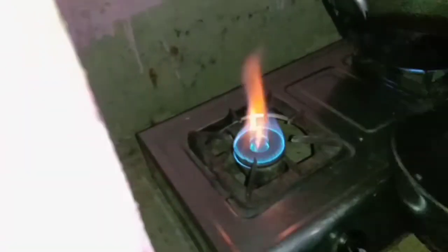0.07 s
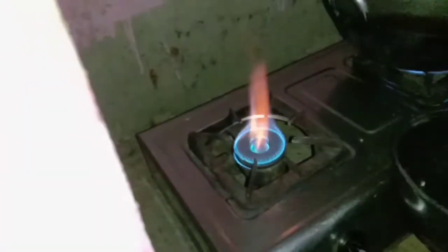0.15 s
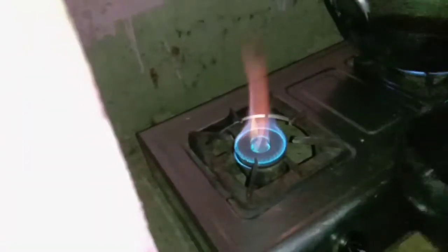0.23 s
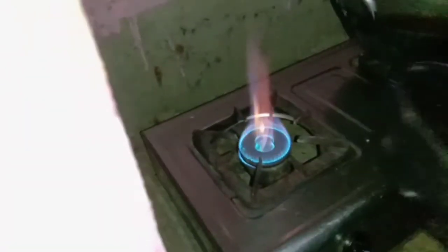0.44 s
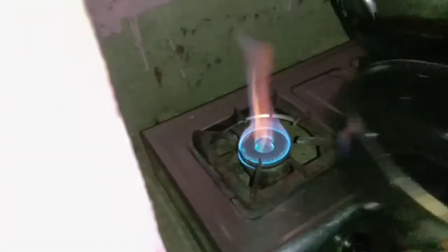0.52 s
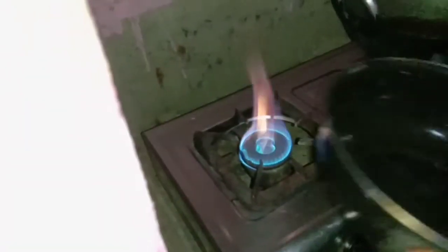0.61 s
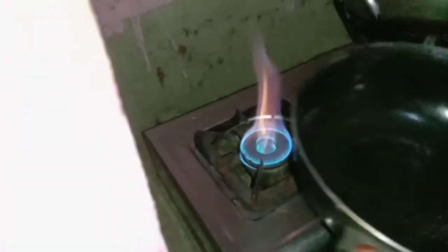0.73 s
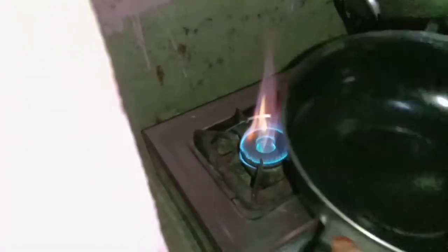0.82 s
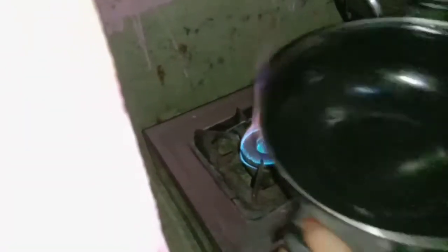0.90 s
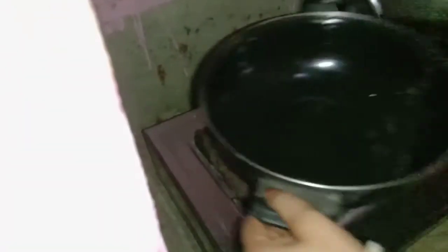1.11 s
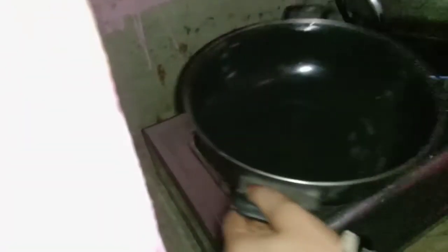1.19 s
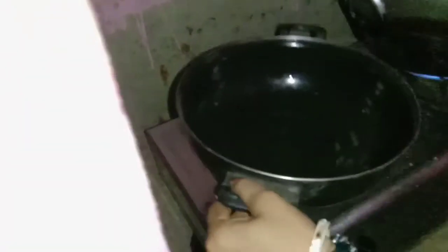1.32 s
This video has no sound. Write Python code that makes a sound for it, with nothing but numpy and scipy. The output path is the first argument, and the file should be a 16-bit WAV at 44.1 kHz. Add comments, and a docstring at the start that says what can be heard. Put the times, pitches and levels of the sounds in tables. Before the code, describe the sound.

A metal pan scrapes and clanks onto a gas stove, then rings and fades.

```python
"""A gas flame rumbles and hisses softly in a small kitchen. A metal pan slides off one side of the
stove, knocks twice against the pan support, scrapes over it with brief squeals and knocks twice more.
Lifted clear, it rings on, each mode swelling and dipping as it is swung towards the lit burner.
Light metal ticks follow as it is lowered."""
import sys
import numpy as np
from scipy import signal
from scipy.fft import rfft, irfft
from scipy.io import wavfile

SR = 44100
rng = np.random.default_rng(int(sys.argv[2]) if len(sys.argv) > 2 else 0)


def store_pcm(level_fs):
    """Save levels as 16-bit WAV."""
    pcm = np.round(np.clip(level_fs, -1, 1) * 32767).astype(np.int16)
    wavfile.write(sys.argv[1], SR, np.atleast_2d(pcm).T)


N = 59535

# Envelopes. Each row: time in seconds, level in dB.
HISS_ENVELOPE = [(.77, -68), (.85, -57.5), (.96, -62), (1.13, -74.5), (1.21, -83)]
RUMBLE_ENVELOPE = [(0, -67.5), (.575, -49), (.6, -45), (.63, -59), (.95, -61), (1.15, -41.5), (1.23, -84),
                   (1.36, -39)]  # grows as the pan disturbs the flame
SLIDE_FORCE = [(0, -39), (.05, -48), (.095, -49.5), (.15, -42.5), (.22, -37.5)]
SCRAPE_FORCE = [(.218, -52), (.235, -9), (.28, 1.5), (.305, -2.5), (.325, -1.5), (.348, -5), (.364, -20),
                (.385, -10.5), (.425, -9), (.52, -14)]
# Noise spectra. Each row: frequency in Hz, relative density in dB.
FLAME_SPECTRUM = [(130, -3), (700, -10.5), (1400, -8.5), (2300, -15.5), (4000, -22.5), (15000, -39)]
CLICK_SPECTRUM = [(2000, -32), (7500, -10), (12500, -16), (15000, -11)]
SLIDE_SPECTRUM = [(100, -44), (250, -39), (1300, 4), (2900, -13), (5000, 0.5), (7500, -12.5),
                  (15000, -17.5)]
GRIT_SPECTRUM = [(130, -58), (255, 8), (420, -33), (1200, -8.5), (2800, 3), (3900, -6), (6500, 0),
                 (13000, -4), (15200, -20)]
CRASH_SPECTRUM = [(90, -85), (190, -13.5), (420, -4.5), (850, -3), (1150, 6), (1650, 5), (2250, -3.5),
                  (3000, -6.5), (3600, 3.5), (5500, 0.5), (9000, -2.5), (13000, -11), (15200, -1.5)]
# Resonances. Each row: frequency in Hz, relative level in dB, t60 of the decay term in seconds.
SLIDING_MODES = [(683, -5, .09), (1240, 7, .13), (1735, 7, .07)]
STOVE_MODES = [(215, -3, .03), (610, 0, .03)]
CONTACT_MODES = [(668, -17, .2), (1112, -7, .2), (1150, -6, .2), (1235, -4, .05), (1640, -4, .04),
                 (1965, -4, .14), (2712, -6, .14), (3430, -3, .03), (3570, -2, .08), (3950, -1, .06),
                 (4555, -6, .08), (5297, -3, .05), (5845, -6, .06), (6620, -5, .08)]  # pan pressed on the support
# Light ticks. Each row: start in seconds, ring level in dB, t60 in seconds, click over ring in dB.
TICK_EVENTS = [(0.1975, -31, 0.042, -13), (0.552, -53, 0.18, 9.5), (0.602, -49.5, 0.071, 10.5),
               (0.944, -50, 0.085, 2), (1.088, -43, 0.056, -32), (1.171, -50, 0.024, -10),
               (1.259, -41.5, 0.038, -22), (1.274, -45.5, 0.14, -15), (1.3375, -39, 0.04, 2)]
# Tick resonances. Each row: frequency in Hz, relative level in dB.
TICK_BANDS = [(5000, -25), (8900, -19.5), (9550, -16), (10000, -18.5), (14800, -16.5)]
# Squeals. Each row: middle in seconds, frequency in Hz, level in dB, half-length in seconds.
SQUEAL_EVENTS = [(.195, 1245, -31, .025), (.278, 3573, -24, .012), (.324, 1116, -18.5, .016),
                 (.351, 1108, -22.5, .011), (.338, 1962, -27, .026)]
# Knocks. Each row: start in seconds, crash level in dB, crash t60 at CRASH_DAMP_HZ in seconds,
# impulse on the pan in dB, impulse on the stove in dB.
KNOCK_EVENTS = [(0.222, -19.5, 0.3, 2.5, -12), (0.246, -23, 0.067, 0.5, -9.5),
                (0.3713, -14.5, 0.18, 4.5, -18), (.399, -21, 0.11, 4, -12.5)]
# Free pan modes. Each row: frequency in Hz, relative level in dB, t60 in seconds,
# time of one dip in seconds, dips per second, dip depth from 0 to 1.
PAN_MODES = [(670, -25, .52, .68, 2.2, .25), (1104.3, -22, .77, .644, 3.3, .36),
             (1718.5, -31, 2.5, .83, 2.45, .45), (1957, -27, .38, .62, 4.8, .5),
             (2463, -38, 1.9, .817, 6.3, .55), (2710, -19.5, .5, .47, 4.4, .25),
             (3031, -30, 1.38, .623, 2.3, .9), (3283, -49, 1.9, .62, 2.2, .85),
             (3556, -24, .36, .765, 1.9, .38), (3675, -31, .47, .585, 5.4, .8),
             (4258, -29, .5, .519, 7.1, .9), (4958.5, -24, .65, .688, 3, .97),
             (5432, -24.5, .7, .5, 2.7, .9), (5990, -32, .76, .571, 6.3, .6),
             (6629, -30, .66, .52, 4.3, .55), (8091, -31, .45, .433, 4.5, .5)]

HISS_LOW_HZ, HISS_PATCHY_DB = 4800, 2.5
RUMBLE_HZ, FLUTTER_DB, BURNER_HZ, BURNER_DB, RUSH_DB = 156, -8, 1257, -57.5, -56
CATCHES_PER_S, CATCH_SCATTER_DB = 500, 5
SLIDE_HISS_DB, SQUEAL_WAVER_RAD, SCRAPE_RING_DB, SCRAPE_GRIT_DB = -1, .3, -21.5, -27.5
CRASH_DAMP_HZ, CRASH_ATTACK_S = 14000, .0012
HELD_DB, FREE_DB, RING_BUILD_S = -8.5, 1, .032  # pan on the support, then lifted clear
ROOM_T60_S, ROOM_DB = .28, -13
LOW_CUT_HZ, TOP_HZ = 80, 15550


def amp(db):
    return 10 ** (np.asarray(db) / 20)


def unit_rms(x):
    return x / np.sqrt(np.mean(x ** 2))


def time_s():
    return np.arange(N) / SR


def bins_hz():
    return np.arange(N // 2 + 1) * SR / N


def envelope(rows):
    """Gain along (s, dB) points, silent after the last."""
    at_s, db = np.array(rows).T
    return amp(np.interp(time_s(), at_s, db, right=-120))


def colour(x, spectrum):
    """Filter by (Hz, dB) points; unit RMS."""
    hz, db = np.array(spectrum).T
    gain = amp(np.interp(np.log(np.maximum(bins_hz(), 1)), np.log(hz), db))
    return unit_rms(irfft(rfft(x) * gain, N))


def noise_band(hz, half_width_hz):
    """Noise in one resonance with steep skirts."""
    detuning = (bins_hz() - hz) / half_width_hz
    return unit_rms(irfft(rfft(rng.standard_normal(N)) / (1 + detuning ** 2), N))


def decay(start_s, t60_s):
    age_s = time_s() - start_s
    return (age_s >= 0) * np.exp(-np.log(1000) * np.maximum(age_s, 0) / t60_s)


def rise(start_s, tau_s):
    return 1 - np.exp(-np.maximum(time_s() - start_s, 0) / tau_s)


def resonate(force, modes):
    """Share a force's energy among modes that build up briefly and decay."""
    t, out = time_s(), np.zeros(N)
    for hz, db, t60_s in modes:
        response = t * decay(0, t60_s) * np.sin(2 * np.pi * hz * t)
        out += amp(db) * unit_rms(signal.fftconvolve(force, response)[:N])
    return unit_rms(out) * np.std(force)


def hiss():
    """Faint high hiss; each band swells and sinks on its own."""
    out = np.zeros(N)
    for hz in np.geomspace(HISS_LOW_HZ, TOP_HZ, 6):
        out += amp(HISS_PATCHY_DB * noise_band(0, half_width_hz=23)) * noise_band(hz, hz / 10)
    return envelope(HISS_ENVELOPE) * unit_rms(out)


def flame():
    """Gas flame: fluttering rumble, soft burner tone, steady rush."""
    flutter = amp(FLUTTER_DB * noise_band(0, half_width_hz=4))
    rumble = envelope(RUMBLE_ENVELOPE) * unit_rms(flutter * noise_band(RUMBLE_HZ, half_width_hz=22.5))
    burner = amp(BURNER_DB) * noise_band(BURNER_HZ, half_width_hz=57)
    rush = amp(RUSH_DB) * colour(rng.standard_normal(N), FLAME_SPECTRUM)
    return rumble + burner + rush


def ticks():
    """Small bright metal contacts as the pan is handled."""
    ring = unit_rms(sum(amp(db) * noise_band(hz, half_width_hz=180) for hz, db in TICK_BANDS))
    click = colour(rng.standard_normal(N), CLICK_SPECTRUM)
    return sum(amp(db) * decay(start_s, t60_s) * (ring + amp(click_db) * click)
               for start_s, db, t60_s, click_db in TICK_EVENTS)


def stick_slip():
    """Dense friction catches of uneven size."""
    caught = rng.random(N) < CATCHES_PER_S / SR
    polarity = np.sign(rng.standard_normal(N))
    return unit_rms(caught * polarity * amp(CATCH_SCATTER_DB * rng.standard_normal(N)))


def slide():
    """Light first slide: friction makes the pan sing and hiss."""
    force = envelope(SLIDE_FORCE)
    ring = resonate(stick_slip() * force, SLIDING_MODES)
    return ring + amp(SLIDE_HISS_DB) * force * colour(rng.standard_normal(N), SLIDE_SPECTRUM)


def squeals():
    """Sliding metal locks briefly onto one resonance: a slightly rough tone."""
    t, out = time_s(), np.zeros(N)
    for middle_s, hz, db, half_s in SQUEAL_EVENTS:
        phase_rad = 2 * np.pi * (hz * t + rng.random())
        waver_rad = SQUEAL_WAVER_RAD * noise_band(0, half_width_hz=38)
        swell = np.exp(-((t - middle_s) / half_s) ** 2)
        out += amp(db) * swell * np.sin(phase_rad + waver_rad)
    return out


def scrape():
    """The base grinds over the support; each catch rattles the stove and rings the touching metal."""
    force = stick_slip() * envelope(SCRAPE_FORCE)
    rattle = rng.standard_normal(N) * decay(0, t60_s=.03)
    grit = colour(signal.fftconvolve(force, rattle)[:N], GRIT_SPECTRUM) * np.std(force)
    return amp(SCRAPE_RING_DB) * resonate(force, CONTACT_MODES) + amp(SCRAPE_GRIT_DB) * grit


def crashes():
    """Knocks shake the crowded, short-lived modes of the sheet-metal stove; treble dies first."""
    hz, out = bins_hz(), np.zeros(N)
    octave = np.floor(np.log2(np.maximum(hz, 250) / 250))
    for start_s, db, t60_s, _, _ in KNOCK_EVENTS:
        spectrum = rfft(colour(rng.standard_normal(N), CRASH_SPECTRUM))
        attack = rise(start_s, CRASH_ATTACK_S)
        for k in np.unique(octave):
            in_band = octave == k
            band_t60_s = 2 * t60_s / (1 + hz[in_band].mean() / CRASH_DAMP_HZ)
            out += amp(db) * attack * decay(start_s, band_t60_s) * irfft(spectrum * in_band, N)
    return out


def knocks():
    """The pan clanks against the support; the stove body thuds."""
    on_pan, on_stove = np.zeros((2, N))
    for start_s, _, _, clank_db, thud_db in KNOCK_EVENTS:
        at = int(start_s * SR)
        on_pan[at], on_stove[at] = amp(clank_db), amp(thud_db)
    return resonate(on_pan, CONTACT_MODES) + resonate(on_stove, STOVE_MODES)


def pan_ring():
    """The first knock pair rings the pan weakly, the second freely; turning swells and dips each mode."""
    t, out = time_s(), np.zeros(N)
    held_s, free_s = KNOCK_EVENTS[0][0], KNOCK_EVENTS[2][0]
    held, free = rise(held_s, RING_BUILD_S), rise(free_s, RING_BUILD_S)
    for hz, db, t60_s, dip_s, dips_per_s, depth in PAN_MODES:
        turning = np.abs(1 - depth * np.exp(2j * np.pi * dips_per_s * (t - dip_s)))
        on_support = amp(HELD_DB) * held * (1 - free) * decay(held_s, t60_s)
        lifted = amp(FREE_DB) * free * decay(free_s, t60_s) * turning
        out += amp(db) * (on_support + lifted) * np.sin(2 * np.pi * (hz * t + rng.random()))
    return out


def scene():
    """Mono mix; only knocks, crashes, scrape and slide get the short kitchen echo."""
    contacts = knocks() + crashes() + scrape() + slide()
    walls = unit_rms(rng.standard_normal(N) * decay(0, ROOM_T60_S)) / np.sqrt(N)
    echo = amp(ROOM_DB) * signal.fftconvolve(contacts, walls)[:N]
    return (contacts + echo + ticks() + squeals() + pan_ring() + flame() + hiss())[None]


def record(dry):
    """Thin the deep bass, cut the top."""
    thin = signal.sosfilt(signal.butter(2, LOW_CUT_HZ, "high", fs=SR, output="sos"), dry)
    return signal.sosfilt(signal.ellip(10, .2, 80, TOP_HZ, fs=SR, output="sos"), thin)


dry = scene()
out = record(dry)
store_pcm(out)
```